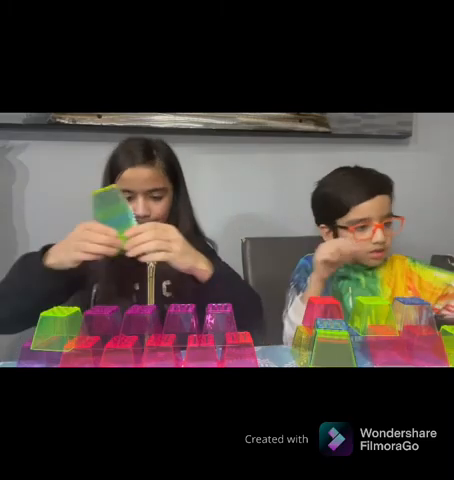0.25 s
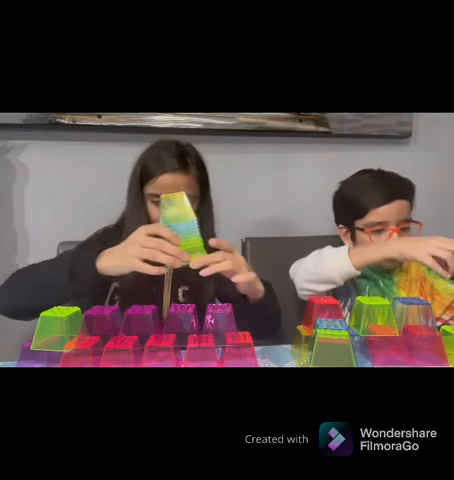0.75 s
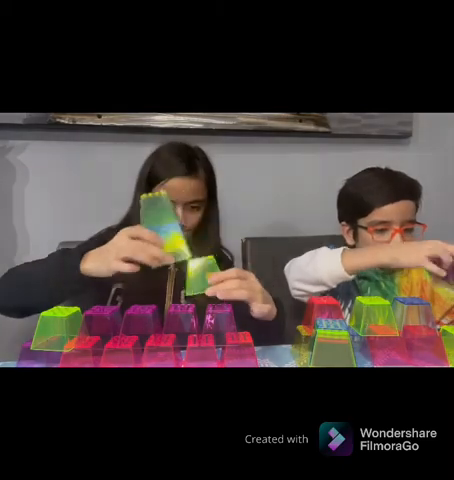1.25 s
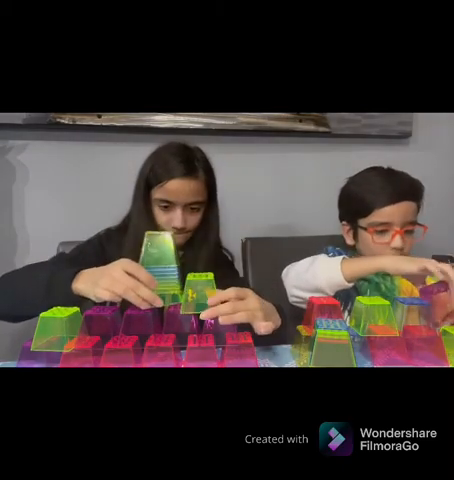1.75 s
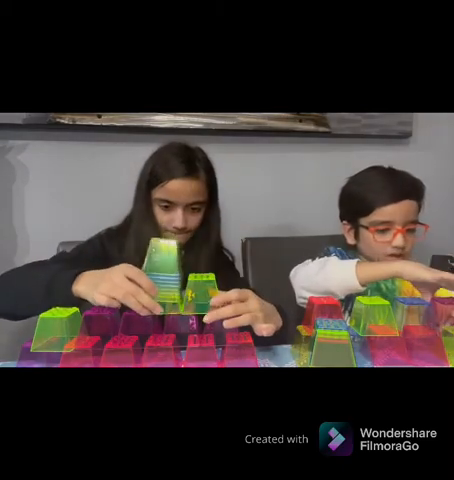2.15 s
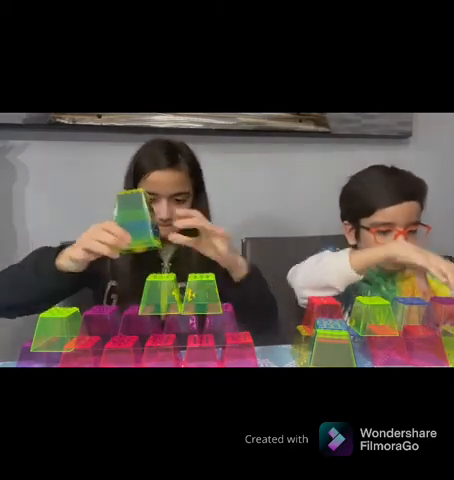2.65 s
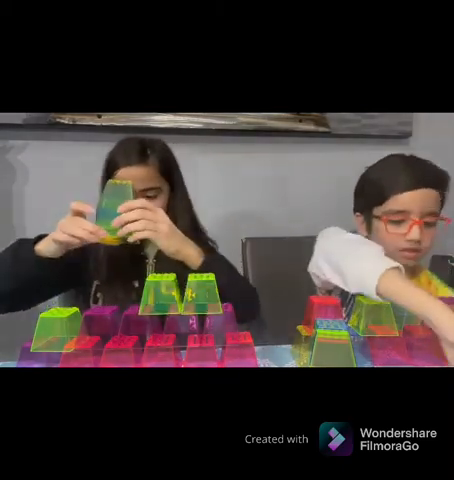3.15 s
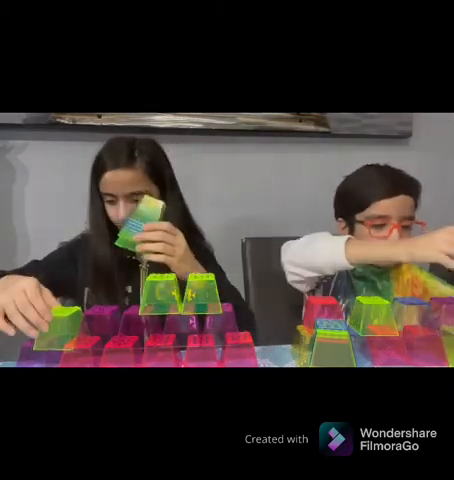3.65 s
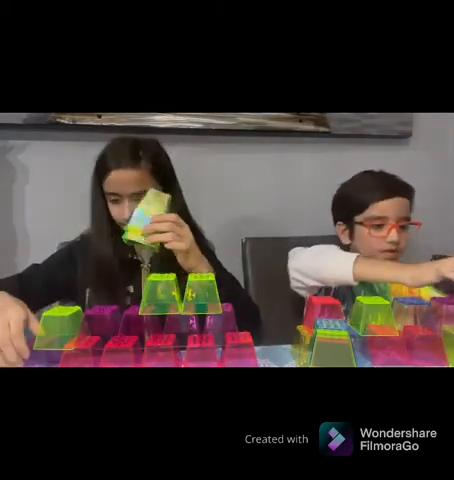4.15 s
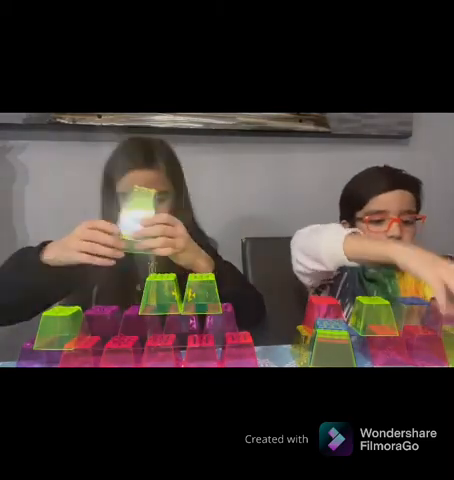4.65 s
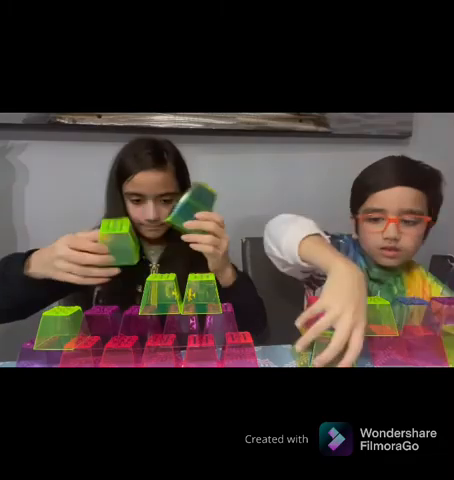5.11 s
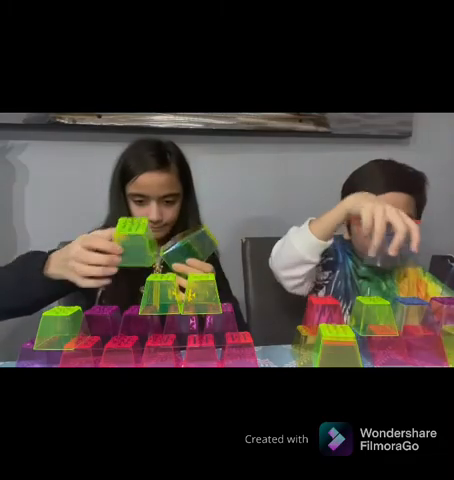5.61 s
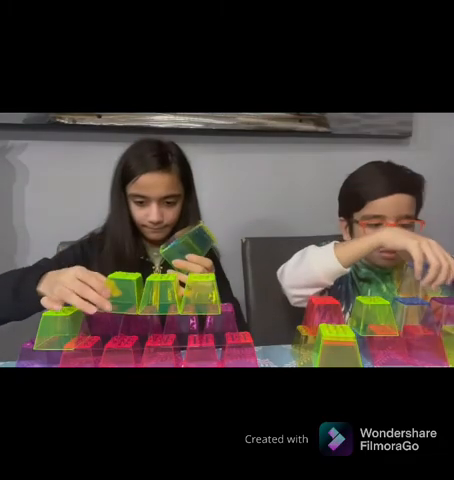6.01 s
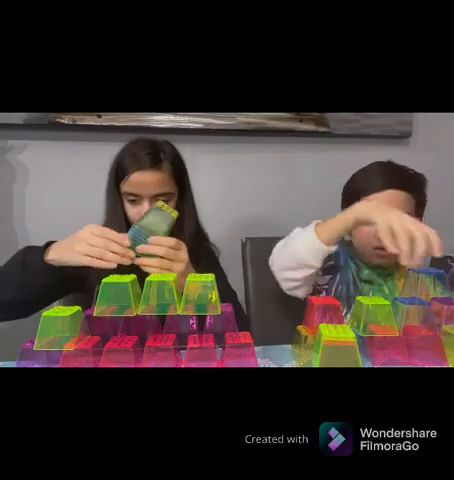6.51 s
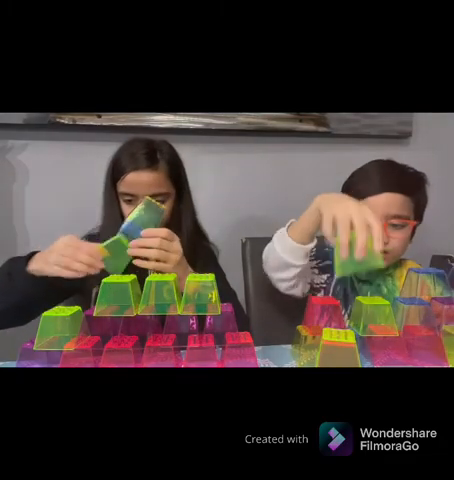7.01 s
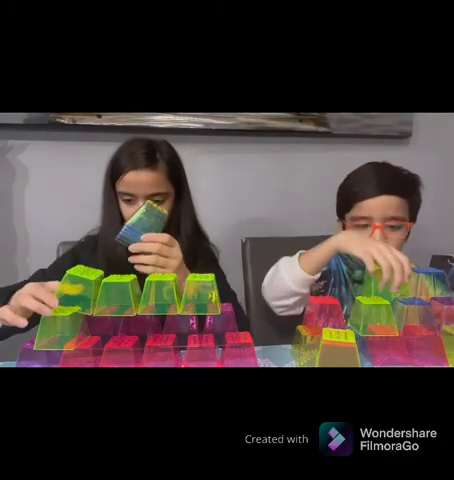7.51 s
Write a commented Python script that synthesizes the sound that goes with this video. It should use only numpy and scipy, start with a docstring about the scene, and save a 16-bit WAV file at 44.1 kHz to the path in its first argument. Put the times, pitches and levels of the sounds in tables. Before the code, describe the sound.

Close stereo in a small room with a short tail and faint low rumble. At 0 s a hollow, pitched knock rings on the right with soft cup rattles, another at 0.15 s, then near quiet with light rubbing. At 1.3-1.4 s cups tick and one clacks hard. From 1.6 to 2.45 s plastic cups clatter in quick succession, with rattling and sliding, strongest around 2.1 and 2.3 s. Then faint scuffs and small ticks until a loud solitary clack at 4.17 s with a dull table thump; a lighter click at 4.5 s. Around 5.3 s a bright scrape, crackle and tiny rising air pop on the right. From 6.0 to 6.5 s firm clacks and chatter return. Near 6.9 s another scrape, soft thumps and pop. After a lull, a final cluster of cup rattles at 7.6-7.75 s.

```python
"""A table in a small room: two children pull hard plastic cups off nested stacks and set them down in pyramids.
Each contact is a blow and rim chatter driving decaying wall, rim and base modes and a noisy crack.
The table top and a hollow object ring as damped modes; random micro-slips make the rubbing of hands and cups.
Rising air tones pop as cups leave their nests. Noise makes the diffuse room tail and the low rumble.
Two close microphone ports hear it with differing level, delay and treble phase."""
import sys
import numpy as np
from scipy import signal
from scipy.fft import rfft, irfft, next_fast_len
from scipy.io import wavfile
from scipy.ndimage import uniform_filter1d

SR = 44100
rng = np.random.default_rng(int(sys.argv[2]) if len(sys.argv) > 2 else 0)


def bounce(signal):
    """Save signal as a 16-bit WAV file at the path given by the first command-line argument."""
    frames = np.transpose(np.atleast_2d(signal))
    limited = np.clip(frames, -1, 1)
    pcm = np.round(limited * 32767).astype(np.int16)
    wavfile.write(sys.argv[1], SR, pcm)


N = 342657

# modes of a freely ringing cup: f/Hz, level/dB, t60/s
CUP_MODES = [(441, -1.5, 0.029), (735, -1.5, 0.011), (781, -4, 0.11), (928, -5.5, 0.081), (1014, -6, 0.056),
             (1237, -3.5, 0.03), (1446, -2.5, 0.036), (1427.5, -3.5, 0.088), (1633, -2.5, 0.018),
             (2601, -13.5, 0.049), (2848, -14, 0.06), (3978, -15, 0.073), (4045, -16.5, 0.027),
             (4990, -12, 0.02), (5390, -9.5, 0.024), (6270, -13, 0.025)]
FAR_RIGHT_LEFT_LAG_S = 0.00028  # sound from the far right end reaches the left port late


def amp(db):
    """Level definition: 20 dB is a factor of ten in amplitude."""
    return 10 ** (np.asarray(db) / 20)


def rms_one(x):
    """Normalisation: scale to unit root mean square."""
    return x / np.sqrt(np.mean(x ** 2) + 1e-20)


def at_hz(points, hz):
    """Logarithmic pitch scale: interpolate a table along log frequency."""
    points = np.array(points)
    return np.interp(np.log(hz), np.log(points[:, 0]), points[:, 1])


def ring(clicks, hz, t60):
    """Damped resonator: a unit click starts a decaying sine of height 1."""
    radius = amp(-60 / (t60 * SR))
    angle = 2 * np.pi * hz / SR
    feedback = [1, -2 * radius * np.cos(angle), radius * radius]
    return signal.lfilter([0, np.sin(angle)], feedback, clicks + 1e-18)


def spectrum_hz(size):
    """Discrete spectrum: the bin frequencies, kept at or above 1 Hz for the log scale."""
    return np.maximum(np.arange(size // 2 + 1) * SR / size, 1)


def colour(x, spectrum):
    """Linear filtering: weight each spectral component by a table of f/Hz, level/dB."""
    size = next_fast_len(x.shape[-1])
    gain = amp(at_hz(spectrum, spectrum_hz(size)))
    return irfft(rfft(x, size) * gain, size)[..., :x.shape[-1]]


def stereo_bands(size):
    """Spatial coherence: half-octave noise bands, left and right sharing a mid and opposing a side part."""
    # coherence of the sound field at the two ports: f/Hz, left-right likeness (0 to 1)
    likeness = [(30, .85), (200, .7), (700, .45), (2500, .55), (6000, .6), (14000, .55)]
    edges_hz = 25 * 2 ** np.arange(0, 9.6, .5)
    white = rng.standard_normal((2, 2, size))
    for k, (low, high) in enumerate(zip(edges_hz, edges_hz[1:])):
        band_pass = signal.butter(2, [low, high], "band", fs=SR, output="sos")
        mid, side = signal.sosfilt(band_pass, white[k % 2])
        hz = np.sqrt(low * high)
        alike = np.clip(at_hz(likeness, hz), 0, 1)
        yield hz, np.sqrt(1 + alike) * mid + np.sqrt(1 - alike) * side * [[1], [-1]]


def rumble():
    """Stationary random noise: low house noise with a faint hiss above."""
    # noise spectrum before overall scaling: f/Hz, density level/dB
    spectrum = [(12, -40), (20, -7.5), (163, 2.5), (678, -21.5), (1090, -39.5), (1370, -50.5),
                (1710, -36.5), (1960, -27), (3250, -40.5), (4180, -39), (7310, -44), (11100, -48.5),
                (13500, -59.5), (16000, -77)]
    noise = sum(amp(at_hz(spectrum, hz)) * band for hz, band in stereo_bands(N))
    return amp(-57.5) * rms_one(noise)


def micro_slips():
    """Stick-slip friction: dense random impulses of uneven strength that come in bunches."""
    slips_per_s, clumps_per_s, clump_db = 4200, 170, 3.5
    slips = (rng.random(N) < slips_per_s / SR) * rng.choice([-1, 1], N)
    slips = slips * amp(2.0 * np.minimum(rng.exponential(1, N), 5))
    bunches = rng.standard_normal(int(clumps_per_s * N / SR) + 2)
    bunching = np.interp(np.arange(N) / SR * clumps_per_s, np.arange(len(bunches)), bunches)
    return slips * amp(clump_db * bunching)


def rubbing():
    """Friction excitation: micro-slips drive heavily damped cup modes and a dry hiss in swelling strokes."""
    # fingers, sleeves and nested cups rubbing, one row a stroke:
    # start t/s, hold t/s, cup body level/dB, hiss level/dB
    strokes = [(0, 0.063, -48, -75), (0.144, 0.066, -58, -64.5), (0.805, 0.055, -57.5, -70),
               (1.005, 0.12, -69.5, -64.5), (1.861, 0.56, -51, -70.5), (2.75, 0.1, -75, -74.5),
               (2.9, 0.077, -63.5, -69.5), (3.11, 0.018, -77.5, -77), (3.215, 0.028, -72.5, -71.5),
               (3.265, 0.015, -74, -71.5), (3.799, 0.38, -74.5, -78.5), (4.156, 0.23, -52.5, -82),
               (4.485, 0.105, -66, -66), (4.697, 0.19, -68, -70), (5.11, 0.048, -80, -78),
               (5.294, 0.065, -67, -50), (5.71, 0.063, -73, -84), (6.008, 0.58, -56, -73.5),
               (6.334, 0.13, -43, -75), (6.724, 0.13, -64, -68), (6.918, 0.057, -53, -51.5),
               (7.596, 0.19, -55.5, -76)]
    rise_db_per_s, fall_db_per_s = 888, 246.5
    scrape_hz, scrape_q, scrape_db = 4740, 1.1, 6

    start, hold, body_db, hiss_db = np.transpose(strokes)[:, :, None]
    now = np.arange(0, N, 64) / SR
    before = np.maximum(start - now, 0)
    after = np.maximum(now - start - hold, 0)
    shape_db = -rise_db_per_s * before - fall_db_per_s * after
    body_gain, hiss_gain = (np.interp(np.arange(N) / SR, now, amp(db + shape_db).sum(axis=0))
                            for db in (body_db, hiss_db))

    slips = micro_slips()
    body = np.zeros(N)
    for k, (hz, db, t60) in enumerate(CUP_MODES):
        body += amp(1.4 * db) * ring(slips, hz, 0.15 * t60) * (-1) ** k
    # the walls colour the hiss
    scraped = slips + amp(scrape_db) * signal.lfilter(*signal.iirpeak(scrape_hz, scrape_q, SR), slips)
    hiss = signal.sosfilt(signal.butter(2, 3200, "high", fs=SR, output="sos"), scraped)
    return rms_one(body) * body_gain + rms_one(hiss) * hiss_gain


def hollow():
    """Modal decay: a hollow object rings freely until a hand damps it, the low modes fastest."""
    # knocks on something hollow on the table: t/s, level/dB, free ringing t/ms, hardness/(dB per octave)
    knocks = [(0.001, -30.5, 140, -0.5), (0.147, -30.5, 47, 8.5)]
    # its modes when free: f/Hz, level/dB, t60/s
    modes = [(645.5, -4, 0.61), (764.4, 1, 1.6), (1318.4, -6, 0.5), (1390, -35.5, 0.2), (1630, -16, 0.35),
             (2598, -30.5, 0.11)]
    out = np.zeros(N + SR)
    hz, mode_db, t60 = np.transpose(modes)[:, :, None]
    t = np.arange(SR // 2) / SR
    rings = amp(mode_db - 60 * t / t60) * np.sin(2 * np.pi * hz * t) * (1 - np.exp(-t / 0.00085))
    for s, level_db, free_ms, hard_db in knocks:
        damped_db = -900 * np.maximum(t - free_ms / 1000, 0) * hz.min() / hz
        tilt_db = hard_db * np.log2(hz / hz.min())
        at = round(s * SR)
        out[at:at + len(t)] += np.sum(rings * amp(level_db + damped_db + tilt_db), axis=0)
    return out[:N]


def room(x):
    """Diffuse reverberation: convolve with noise that fades in after 4 ms and dies band by band."""
    # reverberation time: f/Hz, t60/s
    room_t60 = [(200, 0.46), (800, 0.35), (2000, 0.33), (5000, 0.28), (14000, 0.22)]
    size = SR // 2
    t = np.arange(size) / SR
    tail = sum(band * amp(-60 * t / at_hz(room_t60, hz)) for hz, band in stereo_bands(size))
    tail *= np.clip((t - .004) / 0.0046, 0, 1)
    tail /= np.sqrt(np.sum(tail ** 2) / 2)
    return signal.fftconvolve(x[None], tail, axes=1)[:, :N]


def chatter(t, chatter_ms):
    """Repeated impact: a first blow, then sparse random touches that swell and die."""
    shape = 1.85  # 1 dies evenly, 2 holds and then drops
    slide_in_share = 0.13  # share of the chatter spent swelling
    touches = (rng.random(len(t)) < 1100 / SR) * rng.standard_normal(len(t))
    touches *= amp(-9.0) * np.exp(-(1000 * t / max(chatter_ms, 2)) ** shape)
    touches *= 1 - np.exp(-1000 * t / (slide_in_share * chatter_ms + 0.091))
    touches[0] = np.clip(2.2 - chatter_ms / 22, .08, 1)  # a long sliding contact has no sharp first blow
    return touches


def cup_rings(t, low_hz, high_hz):
    """Modal superposition: grip sets decay, strike point sets strength; return wall and rim rings."""
    wall_t60, rim_t60, grip_t60_share = 0.1, 0.077, 0.73  # favoured rings in s; fingers shorten all rings
    wall_favour_db, rim_favour_db = 7.5, 8.5  # the strike point lifts rings near the favoured pitches
    waver_radians, waver_step = .95, 64  # random phase step, samples between steps

    # two cups meet, their neighbours ring along
    cup_hz, mode_db, t60 = np.tile(np.transpose(CUP_MODES), reps=5)
    high = cup_hz > 2300
    count = len(cup_hz)
    hz = cup_hz * (1 + .075 * rng.standard_normal(count))  # no two cups or grips are alike
    for favoured in (low_hz, high_hz):
        hz[np.argmin(np.abs(hz - favoured))] = favoured
    held_t60 = grip_t60_share * np.select([hz == low_hz, hz == high_hz], [wall_t60, rim_t60], t60)

    favoured_db = sum(lift_db * np.exp(-(np.log(hz / f) / 0.086) ** 2)
                      for f, lift_db in ((low_hz, wall_favour_db), (high_hz, rim_favour_db)))
    strength = amp(mode_db + favoured_db + rng.normal(0, 3.1, (2, count)))
    # each mode beams differently
    phase = rng.choice([0, np.pi], count) + rng.normal(0, 0.79, (2, count))
    # shifting fingers and touching neighbours blur every ring
    steps = waver_radians * rng.standard_normal((count, len(t) // waver_step))
    waver = np.repeat(np.cumsum(steps, axis=1), repeats=waver_step, axis=1)
    waver = uniform_filter1d(waver, size=waver_step, axis=1)

    sines = np.sin(2 * np.pi * hz[:, None] * t + waver + phase[..., None])
    rings = strength[..., None] * sines * amp(-60 * t / held_t60[:, None])
    return rings[:, ~high].sum(axis=1), rings[:, high].sum(axis=1)


def base_ring(t):
    """Single damped mode: the flat base of a cup, with its own phase at each port."""
    hz = 1981.6 * rng.normal(1, 0.0013)
    return np.sin(2 * np.pi * hz * t + rng.normal(0, 0.86, (2, 1))) * amp(-60 * t / 0.047)


def bright_crack(t, high_hz):
    """Broadband impact noise: a short burst coloured by the rim resonance."""
    # crack before the rim colours it: f/Hz, density level/dB
    spectrum = [(300, -6), (1000, 21), (2500, -7), (5000, 1), (7000, 5), (10000, 2.5), (15000, -10.5)]
    crack = colour(rng.standard_normal(len(t)), spectrum) * np.exp(-t / 0.0023)
    return crack + amp(14) * signal.lfilter(*signal.iirpeak(high_hz, 7.0, SR), crack)


def cups():
    """Impact excitation: blow and chatter drive the wall, rim and base modes and the crack."""
    # cup contacts: t/s, peak level/dB, treble level/dB and base ring level/dB (both against the walls),
    # favoured wall ring f/Hz, favoured rim ring f/Hz, left-right level/dB, chatter t/ms
    contacts = [(0.012, -31.5, -32, -8, 1390, 2450, -10, 38),
                (0.146, -21.5, -24.5, -19, 728, 2610, -2.5, 18),
                (0.819, -32.5, -4.5, -41, 850, 4220, -3, 9.3), (0.998, -48, -4, -25, 1490, 3970, -3.5, 32),
                (1.278, -29, 9, -35, 1480.0, 5040, 4.5, 3.9), (1.32, -20, -7.5, 0, 1200, 4120, -0.5, 22),
                (1.343, -24.5, -8, -35, 680.0, 2770, -9, 6.5),
                (1.389, -7.5, -11, -4, 1600, 3940, -1.0, 15.2),
                (1.418, -23.5, -37, -29, 1390, 2590.0, 7, 8.9),
                (1.63, -25, -26.5, -9.5, 768, 2950, -2.5, 6.9),
                (1.697, -28, -26.5, -14.5, 860, 2820, 0.5, 7.9),
                (1.789, -16.5, -19, -6.5, 1231, 2840, 1, 50),
                (1.801, -12.5, -23, -6.5, 1383, 2790, -1.5, 14),
                (1.833, -24, -15.5, -34, 1450, 3030, 1, 29), (1.869, -29, -12, -38, 885, 4270, -5, 30),
                (1.94, -28, -6.5, -35, 1160, 2890, -3, 15), (2.011, -22, -22.5, -3, 903, 2830, -7, 19.5),
                (2.083, -21.5, -17.5, -10.5, 1353, 3960.0, -3, 25),
                (2.115, -10.5, -15, -12, 1443, 3000, -0.5, 14.6),
                (2.151, -10.5, -8.5, -11, 845, 2930, -2, 12),
                (2.268, -19, -13, -12.5, 834.0, 3040, -3.5, 17.6),
                (2.318, -12, -13.5, 0.5, 850, 3870, -3.5, 36.7),
                (2.327, -8, -11, -16, 1337, 3530, 0.5, 17.5), (2.35, -16, -12, -15, 889, 2980, 2, 18),
                (2.444, -28, -15, -31.5, 765, 3870.0, 1.5, 17),
                (2.821, -47.5, 21, -33.5, 485.0, 4740, -2.5, 7.3),
                (3.035, -35, -10.5, -7, 1274, 3970, -6, 6.9), (3.192, -45, -20, -17, 1250, 4080, -4, 6.2),
                (3.451, -42.5, -7.5, -35.5, 770, 3910, -3, 41),
                (3.587, -29.5, -23.5, -9, 1185, 2890, 1, 45), (3.601, -35, -19.5, -31, 867, 3920, 2.5, 48),
                (3.687, -37, -24, -29, 780, 4130.0, 14, 41), (3.705, -29, -14, -39, 1040, 2810, -3, 18),
                (3.765, -29, -21.5, -16, 1402, 2900.0, 1.5, 36),
                (3.973, -46.5, -19, -7.5, 1500, 2900, -4.5, 27), (4.046, -38, -15.5, -43, 900, 3870, 3, 43),
                (4.086, -32, -13, -30, 763, 2940, 0.5, 7.8),
                (4.168, -8.5, -8.5, -14, 903, 2870, -2.5, 19.8),
                (4.206, -21, -13.5, -13, 1414, 2990, -2, 19), (4.359, -36, -31, -16, 1017, 2920, -8.5, 36),
                (4.485, -20.5, -3.5, -10.5, 1347, 3820, 0, 11.4),
                (4.521, -31, -13, -28, 920, 4640, -7.5, 13), (4.543, -31, -8.5, -36, 916, 5040, -3, 8),
                (4.705, -38, -5, -27.0, 1367, 5360, -2.5, 6.9), (4.774, -31, -5.5, -20, 729, 4550, -1, 5.8),
                (4.828, -36, 27, -22, 745.0, 4670.0, 1, 6.8), (4.903, -39.5, -3, -21.5, 1290, 3940, 3, 7.7),
                (5.195, -37, -19.5, -37, 811, 2630, -7, 8.4),
                (5.262, -35, -7.5, -35, 888, 4100.0, -6.5, 51), (5.293, -26, -6.5, -23, 747, 5680, -4, 9.7),
                (5.324, -29, 20, -28.0, 1070.0, 3900, -1, 8.7),
                (5.355, -21, 5, -9, 1480, 4180, -11.5, 15.6), (5.684, -42.5, -23, -26, 742, 4230, 0, 42),
                (5.72, -45.5, 1.5, 1.5, 965, 4280, -3, 9.1), (5.998, -25, -8, -16.5, 930, 2880, -2.5, 37.6),
                (6.021, -22.5, -12.5, -8, 774, 4130, 0, 33),
                (6.039, -11.5, -12.5, -11.5, 633, 3970, -1, 5.1),
                (6.175, -17, -10.5, -17.5, 1200, 3000, 0.5, 15), (6.289, -20, -9.5, -25, 936, 3810, -3, 22),
                (6.3, -14.5, -15.5, -5.5, 927, 2880, -2.5, 19.7),
                (6.428, -19.5, -7.5, -7, 808, 2620, -3.5, 81.0),
                (6.449, -9, -10, -14.5, 1376, 4030, -0.5, 17),
                (6.485, -17.5, -8.5, 1, 1303, 5280, -0.5, 24), (6.753, -42, -14, -35, 805, 2430, 14, 10),
                (6.763, -32, -12.5, -1, 1186, 2370, -4, 6.5), (6.816, -39, -21, -19, 1254, 4070, -4, 14),
                (6.863, -40, -17, -22, 900.0, 2430.0, 1, 4.9), (6.891, -32, -20, -27, 540, 3980.0, -8, 12),
                (6.908, -24, -5.5, -37, 1046, 5310, -2.5, 21.6),
                (6.949, -21, -2.5, -9.5, 1390, 5250, -6.5, 16.5),
                (7.048, -34.5, -18, -17, 1280, 3800, -2.5, 8.8),
                (7.076, -35.5, -0.5, -16.5, 1334, 2410, -3.5, 5.8),
                (7.593, -18.5, -13.5, -26.5, 975, 3765, 3, 42.6),
                (7.601, -15, -15, -1.5, 1317.0, 2840, -9, 18),
                (7.637, -16, -17, -11, 1345, 2930, 0.5, 27.8),
                (7.689, -27.5, -25, -7, 1180, 2900, -6.5, 6.4),
                (7.746, -21.5, -16.5, -7, 865, 3120, -0.5, 27)]
    size = 4096
    out = np.zeros((2, N + 8192))
    t = np.arange(size) / SR
    onset = 1 - np.exp(-t / 0.00063)  # the walls take this long to start ringing
    for s, peak_db, treble_db, base_db, low_hz, high_hz, pan_db, chatter_ms in contacts:
        touches = chatter(t, chatter_ms)
        walls, rim = cup_rings(t, low_hz, high_hz)
        base = base_ring(t)
        crack = amp(treble_db + 2.0) * rms_one(bright_crack(t, high_hz)) * onset
        body = rms_one(walls) + amp(base_db) * rms_one(base) + amp(treble_db) * rms_one(rim)
        body *= onset

        hard = touches * np.abs(touches) / np.abs(touches).max()  # favours the harder touches
        cracks = signal.fftconvolve(crack, hard)
        hit = signal.fftconvolve(body, touches[None], axes=1) + cracks
        hit *= amp(pan_db * np.array([[.5], [-.5]]))
        hit *= amp(peak_db) / np.abs(hit).max(axis=1).mean()

        at = round(s * SR)
        # the further right the contact, the later the left port hears it
        late = at + round(FAR_RIGHT_LEFT_LAG_S * SR * np.clip((-pan_db - 3) / 5, 0, 1))
        out[0, late:late + hit.shape[1]] += hit[0]
        out[1, at:at + hit.shape[1]] += hit[1]
    # the cup sounds carry nothing below about 200 Hz
    return signal.sosfilt(signal.butter(2, 200, "high", fs=SR, output="sos"), out[:, :N])


def table():
    """Plate modes: soft pushes ring the table top, each mode with its own strength per push."""
    # arms and cups pushing the table top: t/s, level/dB, hardness/(dB per octave)
    thumps = [(0.015, -36.5, 4), (0.143, -33.5, 5.5), (3.228, -39.5, -4), (4.174, -35.5, 6.5),
              (4.577, -46, -2.5), (5.293, -36.5, -1.5), (5.306, -37, -8.5), (6.037, -43.5, 5.5),
              (6.308, -46.5, 0), (6.766, -42, -7.5), (6.893, -35.5, -6.5), (6.924, -38, -4.5),
              (7.606, -41.5, 5)]
    # modes of the table top: f/Hz, level/dB, t60/s
    modes = [(56.9, -7.5, 0.24), (86.5, -6.5, 0.12), (108, -13, 0.063), (135.5, 1.5, 0.28),
             (199.7, -2, 0.14), (273.2, 1, 0.086), (333.4, -10, 0.38)]
    s, level_db, hard_db = np.transpose(thumps)
    at = [round(x * SR) for x in s]
    out = np.zeros(N)
    luck_db = rng.normal(0, 1.0, (len(thumps), len(modes)))
    for k, (hz, mode_db, t60) in enumerate(modes):
        tilt_db = hard_db * np.log2(hz / modes[3][0])
        clicks = np.zeros(N)
        clicks[at] = amp(level_db + mode_db + tilt_db + luck_db[:, k]) * (-1) ** k
        out += ring(clicks, hz, t60)
    return signal.sosfilt(signal.butter(2, [55, 300], "band", fs=SR, output="sos"), out)


def pops():
    """Air resonance: the gap between two cups opens, so its tone rises while it dies."""
    # air popping as a cup leaves its nest: t/s, level/dB, starting f/Hz, left-right level/dB
    releases = [(5.324, -20, 1033, -24.5), (6.913, -19, 1086, -18)]
    out = np.zeros((2, N))
    t = np.arange(2000) / SR
    envelope = np.exp(-t / 0.004) * (1 - np.exp(-t / 0.011)) * 2
    for s, level_db, start_hz, pan_db in releases:
        tone = np.sin(2 * np.pi * start_hz * (t + 2.5 * t ** 2)) * envelope
        at = round(s * SR)
        out[:, at:at + len(t)] += tone * amp(level_db + pan_db * np.array([[.5], [-.5]]))
    return out


def scene():
    """Superposition: direct sound of all sources, their room tail and the rumble."""
    near = cups() + pops() + table() * amp([[-4.5], [-2.0]]) + rubbing()
    ringing = hollow()
    now = np.arange(N) / SR
    # the hollow object stands at the far right: late and weaker at the left port
    left = np.interp(now - FAR_RIGHT_LEFT_LAG_S, now, ringing)
    ports = np.array([left, ringing]) * amp([[-2], [4]])
    tail = room(amp(-10.5) * near.mean(axis=0) + amp(-11.5) * ringing)
    return near + ports + tail + rumble()


def record(dry):
    """Phase response: the housing shifts the treble phase between the two ports; the top is cut."""
    # phase between the ports: f/Hz, left lead/rad
    port_phase = [(60, .1), (700, -.4), (1500, .2), (4300, -.3), (5300, -2.7), (7500, -2.9), (9400, -1.6),
                  (10800, -.2), (14000, .3)]
    size = next_fast_len(N)
    turn = np.exp(.5j * at_hz(port_phase, spectrum_hz(size)) * [[1], [-1]])  # half the angle at each port
    ports = irfft(rfft(dry, size) * turn, size)[:, :N]
    return signal.sosfilt(signal.cheby2(12, 70, 16400, fs=SR, output="sos"), ports)


dry = scene()
out = record(dry)
bounce(out)
```